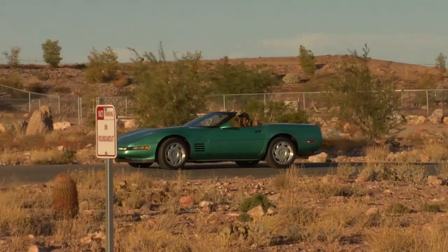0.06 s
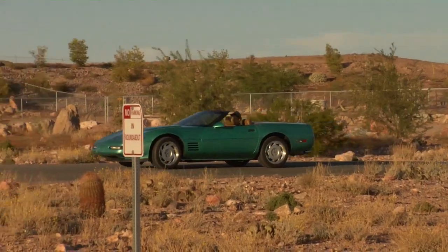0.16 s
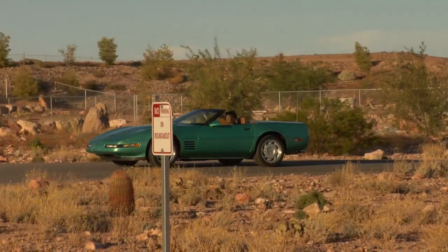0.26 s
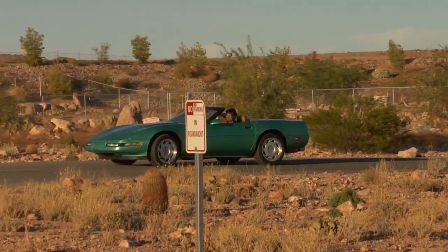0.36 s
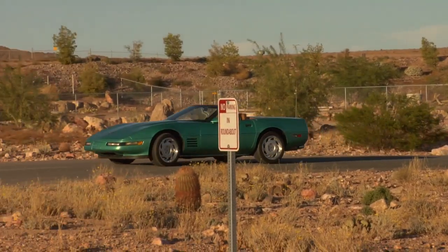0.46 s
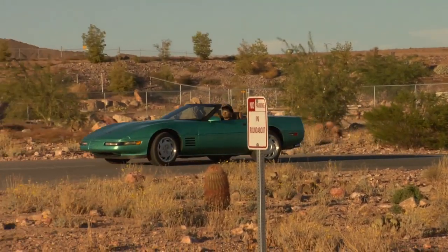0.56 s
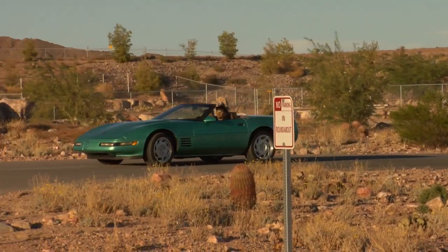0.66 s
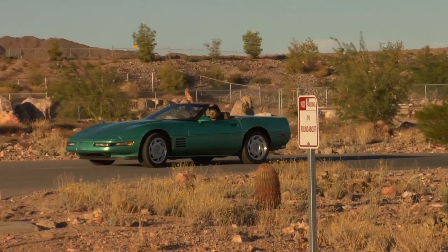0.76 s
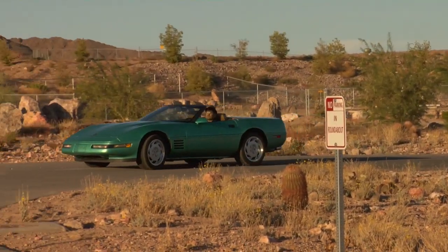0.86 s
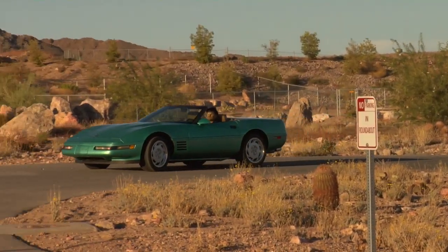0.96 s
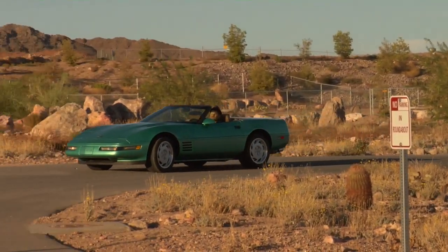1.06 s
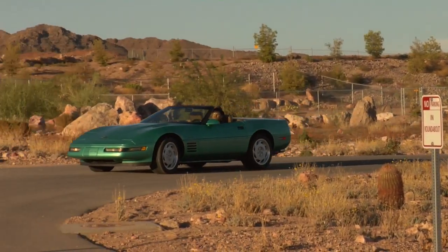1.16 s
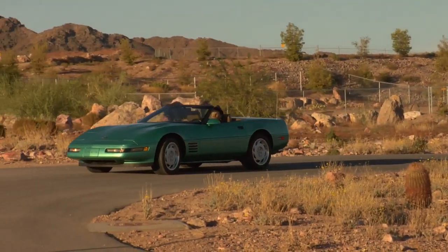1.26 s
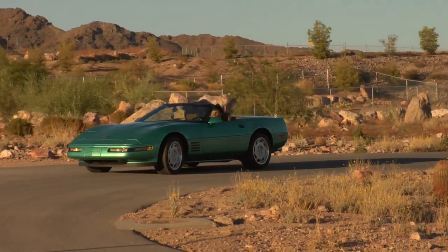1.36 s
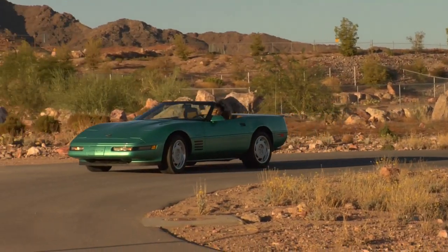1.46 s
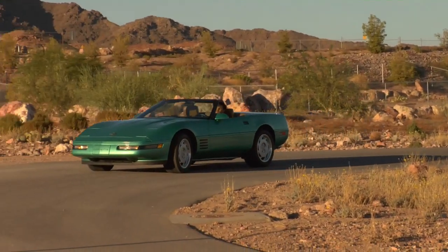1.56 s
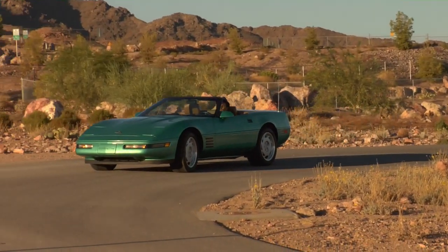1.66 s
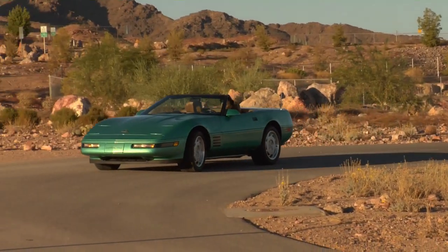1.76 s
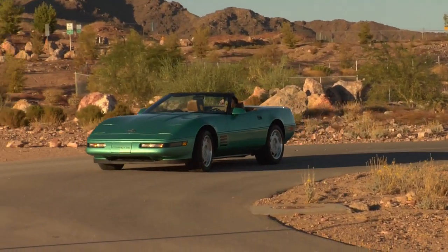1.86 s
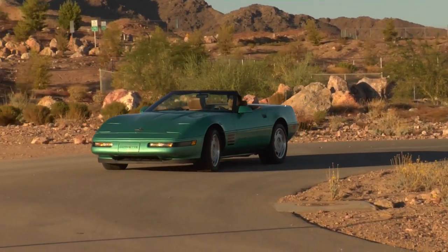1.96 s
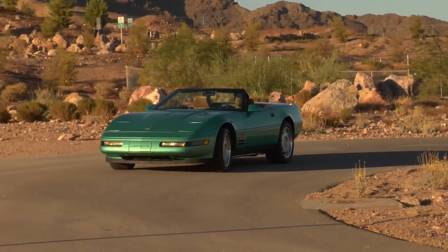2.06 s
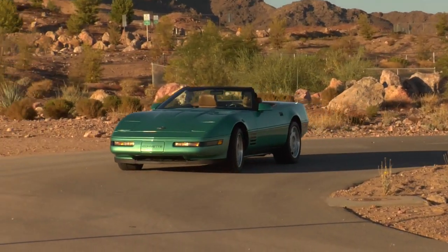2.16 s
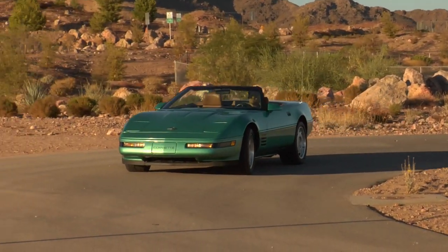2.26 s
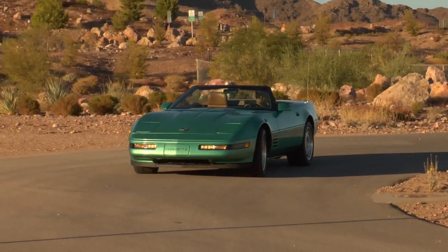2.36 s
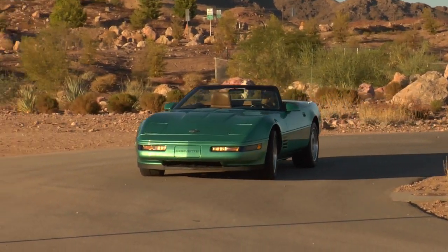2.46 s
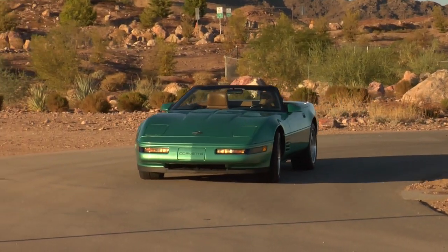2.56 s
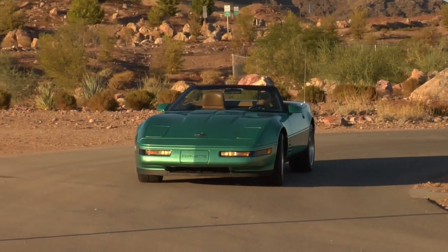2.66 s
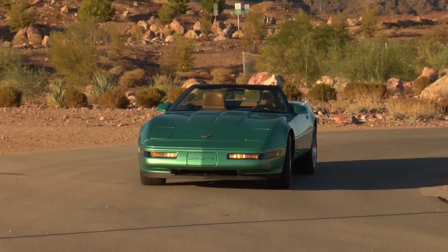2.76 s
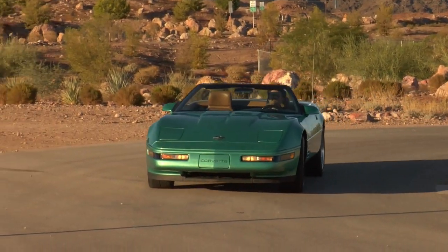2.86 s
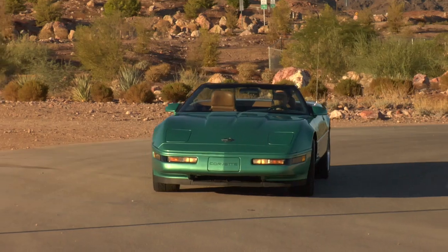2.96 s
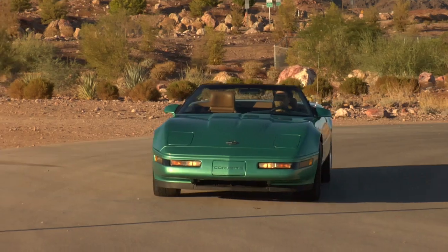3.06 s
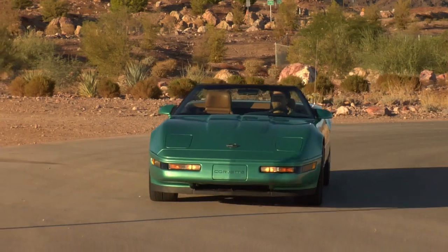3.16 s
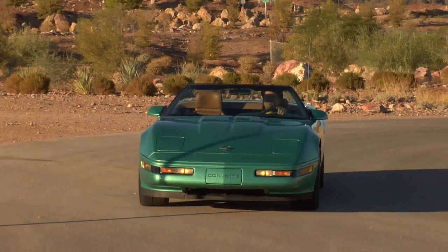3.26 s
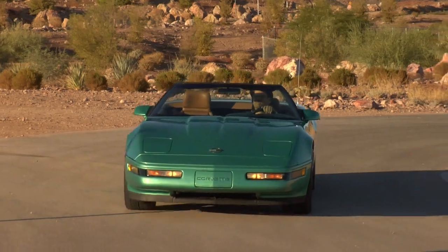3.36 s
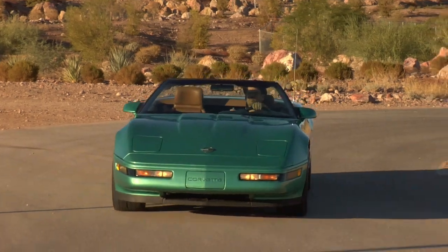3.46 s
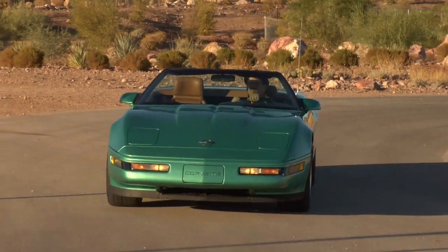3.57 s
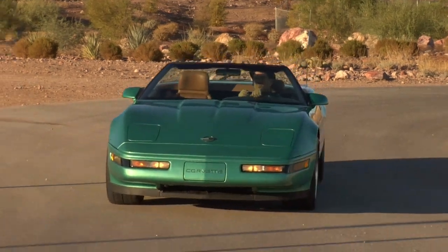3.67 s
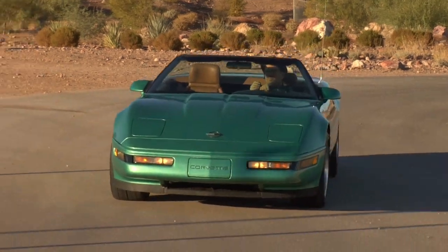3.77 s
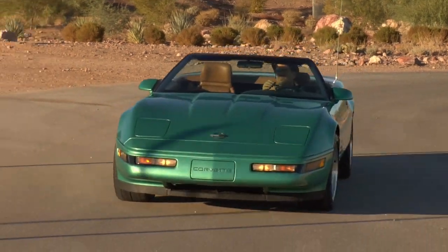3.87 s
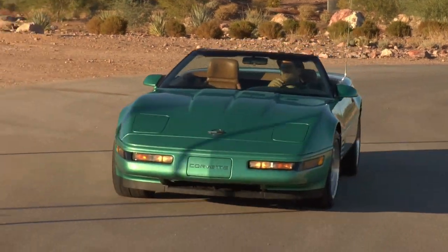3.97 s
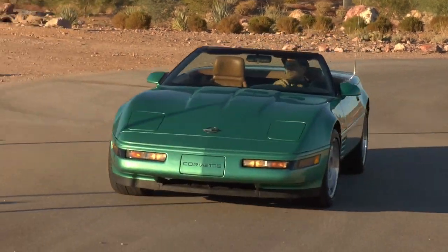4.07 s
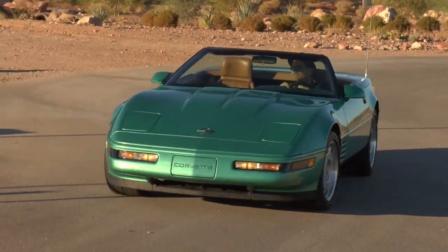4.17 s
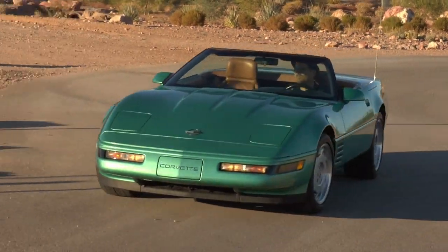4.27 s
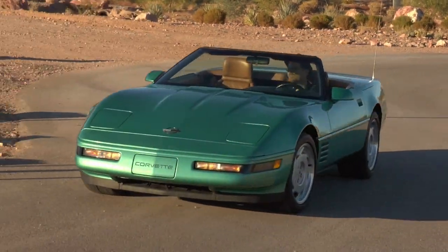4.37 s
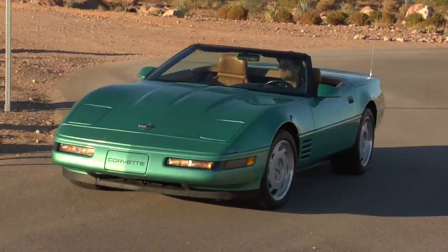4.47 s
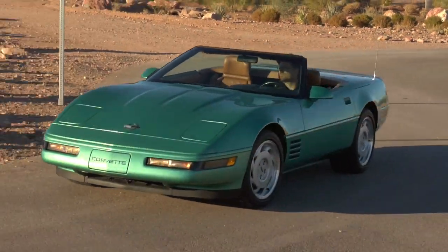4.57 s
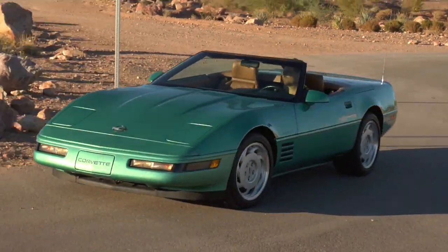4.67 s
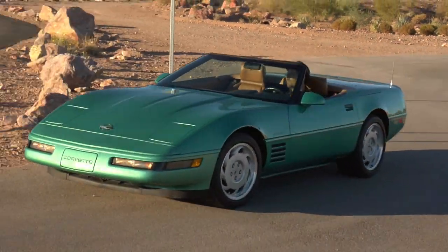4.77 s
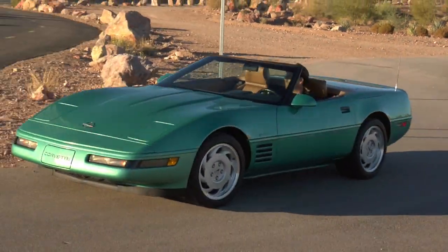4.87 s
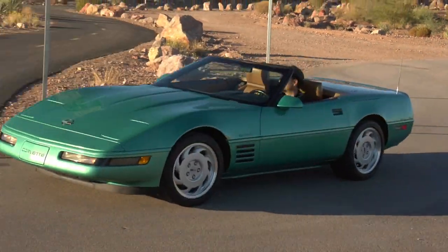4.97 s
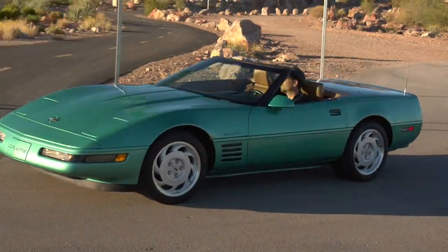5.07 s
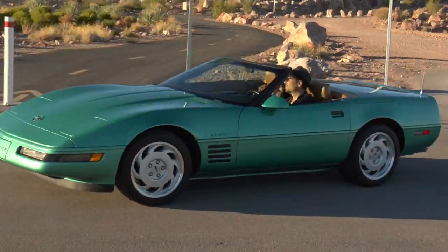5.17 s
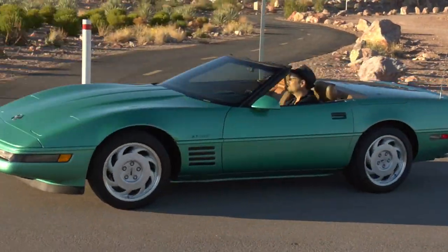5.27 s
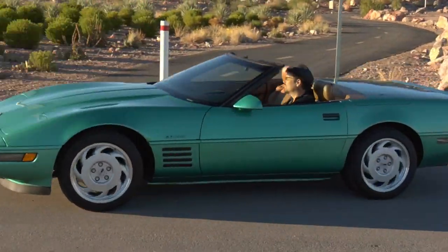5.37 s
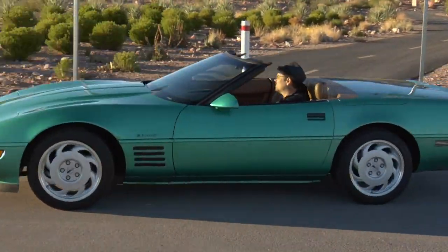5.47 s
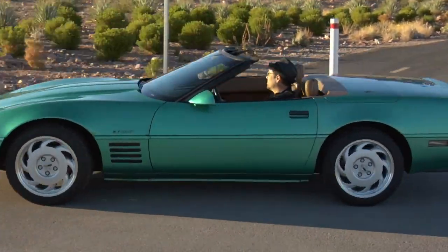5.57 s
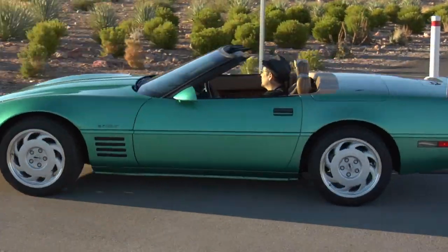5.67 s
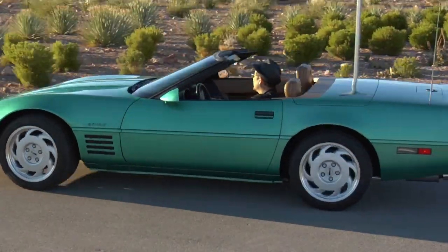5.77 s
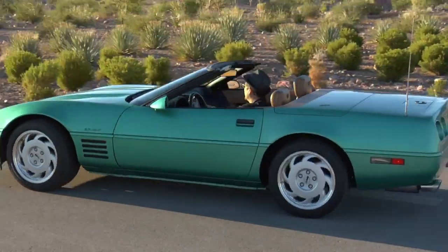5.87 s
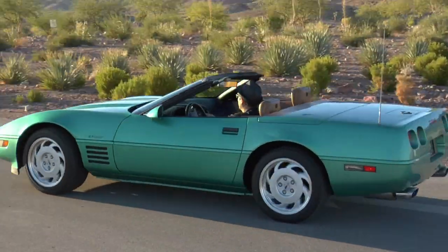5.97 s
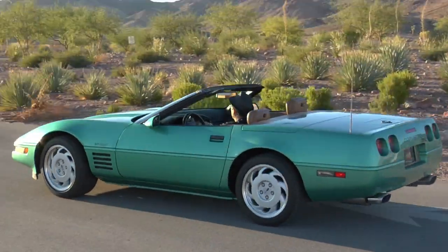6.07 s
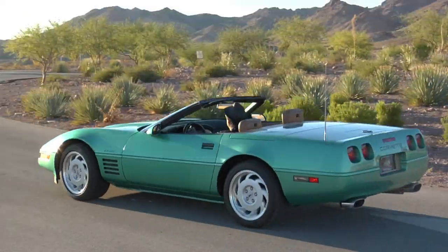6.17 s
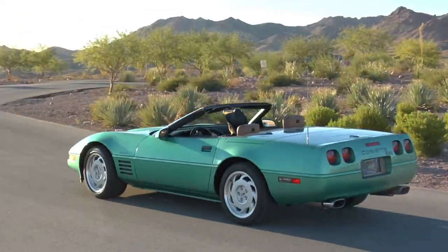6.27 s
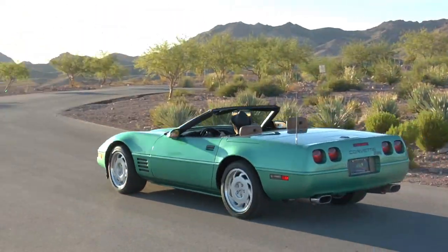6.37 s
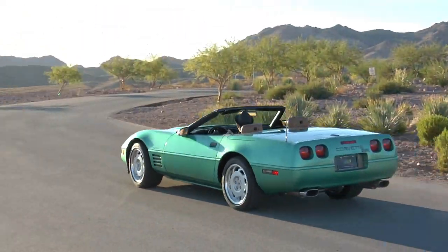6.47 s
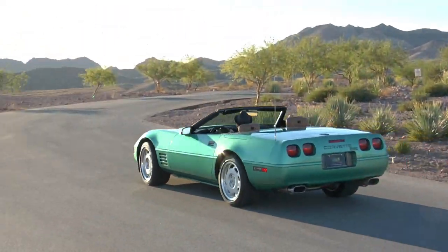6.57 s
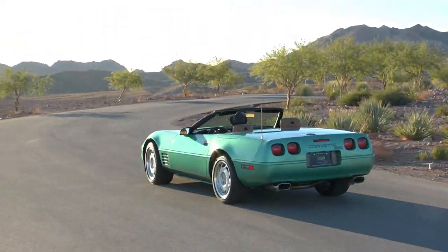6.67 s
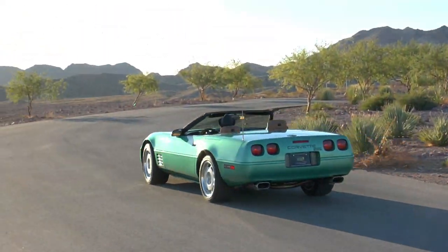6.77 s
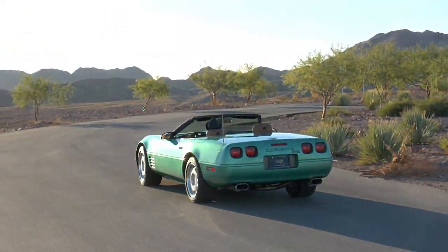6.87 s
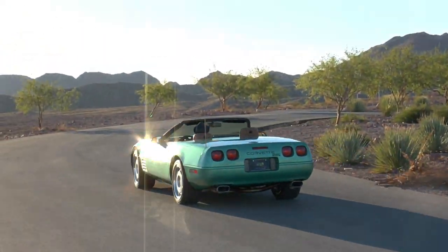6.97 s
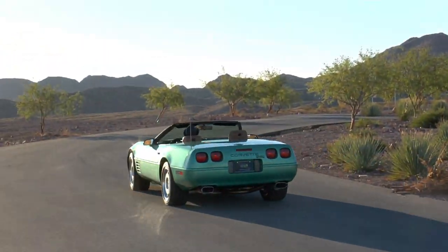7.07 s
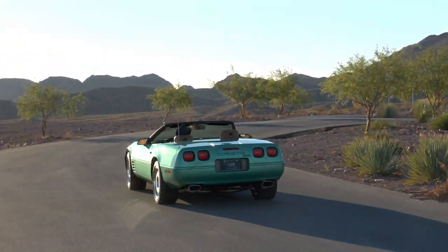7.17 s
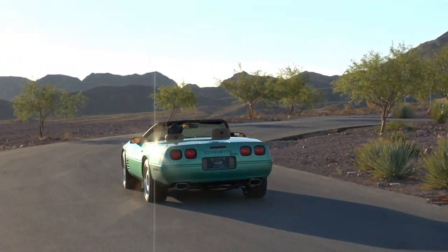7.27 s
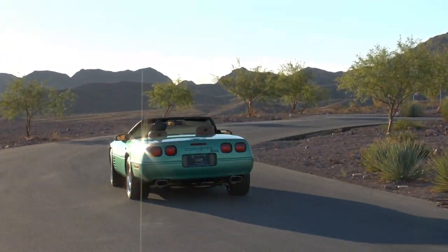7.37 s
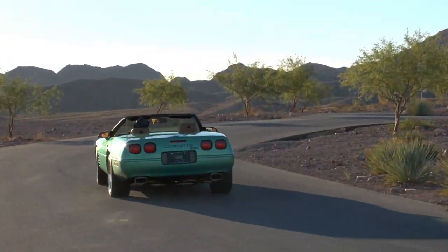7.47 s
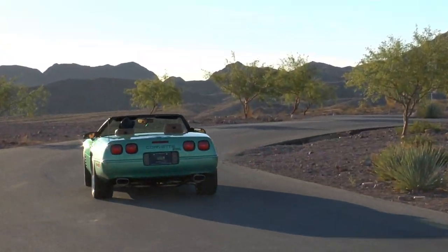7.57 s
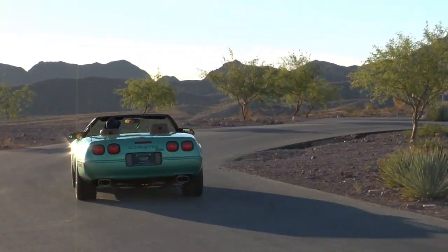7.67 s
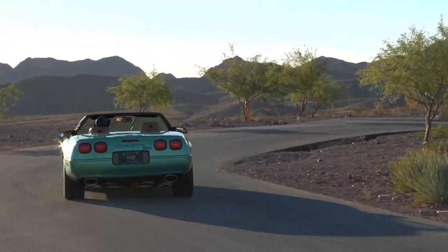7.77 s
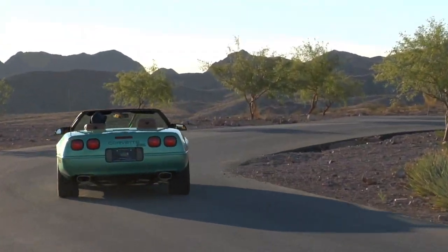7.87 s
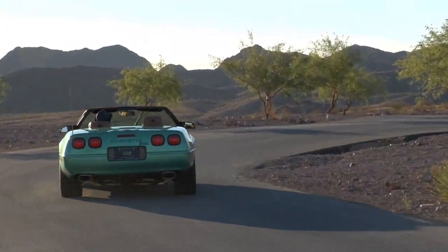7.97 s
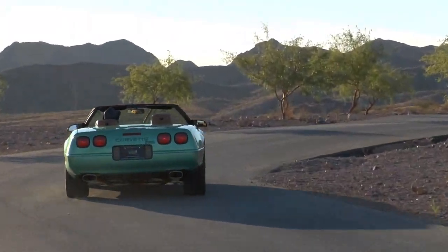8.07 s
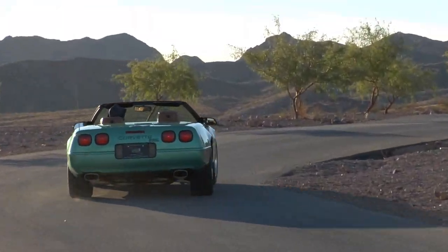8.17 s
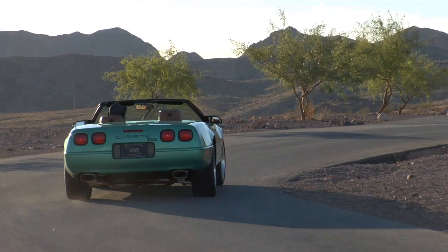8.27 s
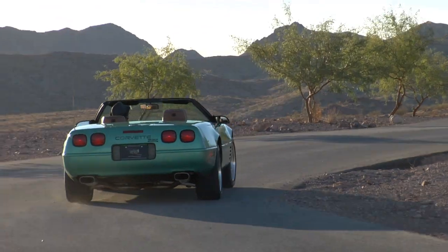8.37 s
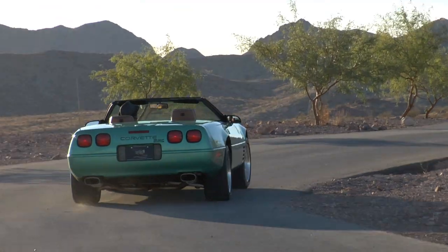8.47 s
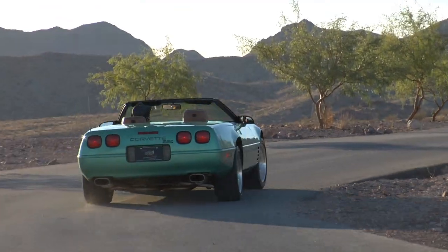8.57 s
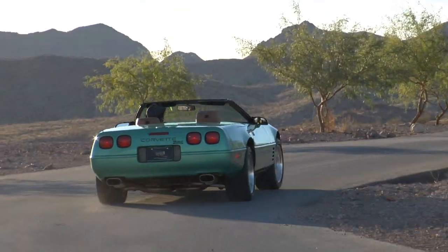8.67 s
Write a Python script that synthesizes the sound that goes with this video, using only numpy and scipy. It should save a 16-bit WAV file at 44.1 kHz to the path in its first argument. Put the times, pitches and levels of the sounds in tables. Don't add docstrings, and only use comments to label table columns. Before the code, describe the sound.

Outdoors on a quiet dry road, a V8 convertible approaches at low revs with soft tyre hum and scattered grit snaps. Near five seconds the throttle opens and the deep exhaust surges, passing close to the roadside microphone just before six. A loose heat shield buzzes faintly behind it, then the burbling exhaust falls in pitch and level as it pulls away.

```python
import sys
import numpy as np
from scipy import signal
from scipy.io import wavfile
from scipy.ndimage import uniform_filter1d

SR = 44100
rng = np.random.default_rng(int(sys.argv[2]) if len(sys.argv) > 2 else 0)


def unload_wav(signal):
    wavfile.write(
        sys.argv[1],
        SR,
        np.round(np.clip(np.atleast_2d(signal).T, -1, 1) * 32767).astype(np.int16),
    )


def gain_from_decibels(decibels):
    exponent = np.asarray(decibels, float) / 20
    return 10 ** exponent


N = 384111

# (centre [Hz], width [Hz], level [dB])
RUMBLE_BANDS = [(35, 15, -19), (64, 44, -4.5), (107, 25, -8), (164, 70, -3)]
DISTANT_HISS = [(1530, 800, -69.5), (2230, 580, -73)]
# (pitch [Hz], level [dB])
WHINES = [(8392, -104), (15674, -99), (15734, -96)]
HISS_DB = -74.5

# (time [s], distance [m])
PATH = [(0, 30.2), (1.4, 24.8), (2.6, 19.6), (4.2, 14.9), (4.8, 8.56), (5.4, 5.5), (5.85, 3.97), (6.3, 4.9),
        (7.0, 7.5), (7.6, 11), (8.4, 16), (8.71, 28)]
CLOSEST_M = 4.14
CLEAR_S = 2.27
LAYERS = {"boom": (-31, 1.0, -0.9, -0.08), "bark": (-37, 0.9352, 2, -0.03), "roar": (-42, 0.6231, 18, 0.4),
          "hiss": (-46, 0.7442, 18, 0.09), "sizzle": (-64, 1.26, -5.5, 0),
          "rumble": (-42.5, 0.28, 0.1, 0.3)}
SWELLS = {"boom": [(1.85, 4.5, 0.7), (2.65, 2, .1), (4.72, 3, .1), (5.85, 2, 0.084), (6.75, -4.5, .2),
          (8.1, -1.5, .2)], "bark": [(5.7, -1.5, .3), (6.66, 6, .25), (7.65, 2, .2)],
          "roar": [(5.15, -2, .12), (6.29, 4.5, .1), (7.8, 3, 0.77)], "hiss": [(1.1, -10.5, 0.25),
          (8.2, 3, 0.33)], "sizzle": [(4.55, 4.5, .25), (5.35, 3, .3), (7.6, -6, .4)],
          "rumble": [(.9, 0, .3), (2.1, -7, 0.35), (3.8, 3.5, 0.26), (4.5, 1.5, 0.41), (7.9, -7.5, .2),
          (8.4, 4, 0.096)]}

# (time [s], peak [dB], pitch [Hz])
GRIT = [(3.5833, -57, 4000), (3.6214, -60, 3800), (4.2453, -54, 3200), (4.4159, -57, 3000),
        (4.4747, -55, 2800), (4.4974, -52, 2700), (4.5351, -50, 2800), (4.6774, -56, 5200),
        (4.8419, -52, 3700), (5.229, -55, 4500), (6.5624, -54, 3700), (7.21, -49, 3500),
        (7.5752, -58, 3000)]
SNAP_S, SNAP_DB = .00025, 1.0
# (time [s], peak [dB])
ROAD_SEAM = [
    (8.215, -33),
]
# (time [s], peak [dB])
CHATTER = [(5.8885, -59), (6.0437, -56), (6.0746, -54), (6.1285, -64), (6.1564, -63), (6.1938, -61),
           (6.2267, -63), (6.2761, -54), (6.2886, -51), (6.316, -49), (6.3609, -56), (6.3949, -52),
           (6.4194, -57), (6.4722, -53), (6.5246, -61), (6.5544, -65), (6.6019, -65), (6.6862, -64),
           (6.7057, -64), (6.8384, -65), (6.9102, -67), (6.9401, -64), (7.1516, -68), (7.1846, -59),
           (7.438, -71), (7.5936, -69), (7.675, -72), (8.4068, -74), (8.548, -74)]
# (centre [Hz], width [Hz], level [dB])
SHIELD_HIGH = [(5090, 330, 0), (5090, 900, -3)]
SHIELD_LOW = [(2400, 140, 0.5), (2870, 420, 5.5), (950, 300, -2.5)]

# (centre [Hz], width [Hz], level [dB])
ROAR = [(806, 140, 1), (960.4, 158, 4.5), (1108, 200, -1)]
SIDEWALL = [(366, 150, -8.5)]
TREAD = [(1437, 615, 12.5), (1910, 510, 6), (2480, 680, -3.5), (2970, 1000, 0), (3916, 1400, -5.5),
         (5230, 1800, -8), (7000, 1700, -13.5)]
# (time [s], pitch [Hz], level [dB])
TREAD_HUM = [
    (0, 520, -66),
    (1.8, 500, -61),
    (3.0, 486, -58),
    (3.6, 478, -52),
    (4.3, 465, -52.5),
    (5.0, 456, -48),
    (5.3, 459, -81),
    (8.71, 459, -90.5),
]

# (centre [Hz], width [Hz], level [dB])
BOOM = [(210, 50, -3.5), (245.1, 38.4, 2), (290.7, 49, -6.5)]
BARK = [(380, 70, -5), (442, 80, 2), (520, 88, 2.5), (608.6, 100, 1.5)]
CYLINDERS_DB = [-2.5, -4, -1, -3, -3, -1, -8.5, -1.5]

# (time [s], firing rate [Hz], exhaust level [dB])
ENGINE = [(0, 54.7, -55), (.4, 57.75, -53), (1.6, 53.66, -57), (2.4, 53.18, -52), (2.8, 55.56, -50),
          (4.4, 52.86, -44.5), (4.8, 55.02, -46.5), (5.0, 62.54, -35.5), (5.3, 89.5, -23),
          (5.5, 99.33, -19), (5.7, 103.5, -17), (6.15, 99.53, -18), (6.6, 104.9, -18.5), (7.2, 97.1, -24),
          (7.55, 98.5, -24), (8.0, 88.8, -30.5), (8.3, 82.04, -35.5), (8.71, 86.83, -34)]
# (coasting [dB], on throttle [dB])
TONES = [
    (-1, 0),
    (6.5, -11.5),
    (-20.5, -17),
    (-12, -8.5),
]
# (time [s], lift [dB], width [s])
LOBES = [
    [(6.16, -8, 0.19)],
    [(5.2, -4.5, .08), (5.42, -14, 0.18), (5.9, -10, 0.13), (6.31, -19.5, .17), (7.72, -5, .1),
     (8.3, 14, 0.38)],
    [(5.1, -13.5, 0.35)],
    [(5.08, -20.5, .1), (5.95, -14.5, .27)],
]
# (order [1], leader [index], coasting against leader [dB], on throttle against leader [dB])
SIDE_ORDERS = [(4, 2, -6, -23), (7, 2, 7, -10), (9, 3, -7.5, -13), (11, 3, 4.5, -13.5), (12, 3, 0.5, -12.5),
               (13, 3, 0.5, -11.5), (14, 3, 2, -10.5), (18, 1, -16, -12), (19, 4, -21, -15.5),
               (20, 4, -22.5, -16.5), (21, 4, -24, -12.5), (23, 4, -32, -7), (23, 1, -11, -29),
               (24, 4, -22, -11), (24, 1, -16.5, -31), (25, 4, -15.5, -20.5)]
TAIL_S, TAIL_TURN_S, FLANK_DB = 6.35, .3, -7.5
# (time [s], lift [dB], width [s])
BURBLE = [
    (7.0, 5, .45),
    (8.5, -4, .4),
]
RASP_DB = 1.8


def curves(table):
    s, *columns = np.transpose(table)
    return [np.interp(np.arange(N) / SR, s, column) for column in columns]


def unit(x):
    return x / np.sqrt(np.mean(x ** 2))


def ring(x, modes, order=1):
    out = np.zeros(N)
    for hz, width, db in modes:
        edges = [hz - width / 2, hz + width / 2]
        sos = signal.butter(order, edges, "bandpass", fs=SR, output="sos")
        out += gain_from_decibels(db) * signal.sosfilt(sos, x) / np.sqrt(width)
    return out


def rush(modes, order=2):
    return sum(ring(rng.standard_normal(N), [mode], order=order) for mode in modes)


def walk(rate):
    hold = int(SR / rate / 32)
    steps = np.repeat(rng.standard_normal(N // 32 // hold + 2), hold)
    slow = uniform_filter1d(uniform_filter1d(steps, hold), hold)
    return 1.3 * np.interp(np.arange(N) / 32, np.arange(len(slow)), slow)


def swells(rows):
    t = np.arange(N) / SR
    return sum(db * np.exp(-.5 * ((t - s) / width) ** 2) for s, db, width in rows)


def heard(layer):
    top_db, share, screen_db, lead_s = LAYERS[layer]
    t = np.arange(N) / SR
    metres = np.interp(t + lead_s, *np.transpose(PATH))
    distance_db = share * 20 * np.log10(metres / CLOSEST_M)
    verge_db = screen_db * np.clip(1 - t / CLEAR_S, 0, 1)
    return top_db - distance_db - verge_db + swells(SWELLS[layer])


def bursts(table, rise_s, fall_s):
    t = np.arange(int(.15 * SR)) / SR
    shape = (1 - np.exp(-t / rise_s)) * np.exp(-t / fall_s)
    starts = np.zeros(N)
    for s, db in table:
        starts[int(s * SR)] = gain_from_decibels(db)
    return signal.fftconvolve(starts, shape / shape.max())[:N]


def ambience():
    rumble = unit(sum(gain_from_decibels(1.7 * walk(2.9)) * rush([band]) for band in RUMBLE_BANDS))
    far = sum(gain_from_decibels(db) * unit(rush([(hz, width, 0)])) for hz, width, db in DISTANT_HISS)
    hiss = gain_from_decibels(HISS_DB) * rng.standard_normal(N)
    whine = sum(gain_from_decibels(db) * np.sin(2 * np.pi * hz * np.arange(N) / SR) for hz, db in WHINES)
    return gain_from_decibels(heard("rumble")) * rumble + far + hiss + whine


def grit():
    out = bursts(ROAD_SEAM, .025, 0.045) * np.sin(2 * np.pi * 118 * np.arange(N) / SR)
    t = np.arange(SR // 200) / SR
    snap = t / SNAP_S * np.exp(1 - t / SNAP_S)
    for s, db, hz in GRIT:
        out[int(s * SR):][:len(t)] += gain_from_decibels(db + SNAP_DB) * snap * np.sin(2 * np.pi * hz * t)
    return out


def heat_shield():
    contacts = rng.standard_normal((2, N))
    high = unit(ring(bursts(CHATTER, .003, .013) * contacts[0], SHIELD_HIGH, order=2))
    low = unit(ring(bursts(CHATTER, .004, 0.012) * contacts[1], SHIELD_LOW, order=2))
    return gain_from_decibels(-77) * high + gain_from_decibels(-73) * low


def tyres(roar_db, hiss_db):
    hum_hz, hum_db = curves(TREAD_HUM)
    hum_phase = 2 * np.pi * np.cumsum(hum_hz + 4 * walk(9)) / SR
    hum = gain_from_decibels(hum_db + 1.6 * walk(2.3)) * np.sin(hum_phase)

    roar = unit(rush(ROAR)) + gain_from_decibels(SIDEWALL[0][2]) * unit(rush(SIDEWALL))
    roar *= gain_from_decibels(roar_db + 0.66 * walk(8.7))

    sizzle_db = heard("sizzle")
    far_db = sizzle_db - sizzle_db.max()
    hiss = unit(rush(TREAD[:2]) + gain_from_decibels(0.62 * far_db + 6.5) * rush(TREAD[2:3]))
    hiss *= gain_from_decibels(hiss_db + 0.33 * walk(10))

    sizzle = sum(gain_from_decibels(lose * far_db) * rush([mode]) for mode, lose in zip(TREAD[3:], (0, .1, .3, .6)))
    sizzle /= np.sqrt(np.mean(rush(TREAD[3:5]) ** 2))
    return hum + roar + hiss + gain_from_decibels(sizzle_db + 0.5) * sizzle


def firings(cycle, rate_hz):
    at = np.flatnonzero(np.diff(np.floor(8 * cycle))) + 1
    chance = rng.standard_normal((len(at), 2))
    which = np.arange(len(at)) % 8
    lag = (.2 * rng.random(8)[which] + .02 * chance[:, 0]) * SR / rate_hz[at]
    strength = gain_from_decibels(np.array(CYLINDERS_DB)[which] + 1.5 * chance[:, 1])
    pulses = np.zeros(N)
    np.add.at(pulses, np.clip(at + lag.astype(int), 0, N - 1), strength)
    return pulses / np.sqrt(uniform_filter1d(pulses ** 2, SR // 4) + 1e-12)


def body(pulses, boom_db, bark_db, throttle):
    pan = sum(gain_from_decibels(lift_db * (0.5 - throttle)) * rush([mode]) for mode, lift_db in zip(BOOM, (-3, 0, -5)))
    boom = .75 * unit(ring(pulses, [(245, 85, 0)], order=2)) + .7 * unit(pan)
    bark = (.4 + .45 * throttle) * unit(ring(pulses, [(520, 140, 0)], order=2))
    bark += (.9 - .3 * throttle) * unit(rush(BARK))
    return gain_from_decibels(boom_db + 0.77 * walk(7)) * unit(boom) + gain_from_decibels(bark_db + 1.1 * walk(9)) * unit(bark)


def exhaust(cycle, leads_db, throttle):
    steady_db = [uniform_filter1d(db, SR // 3) for db in leads_db]
    fire, lope = (np.exp(2j * np.pi * (k * cycle + rng.random() + .004 * walk(9))) for k in (8, 5))
    octave = fire ** 2
    double_lope = -1j * lope ** 2
    scramble = np.clip((steady_db[4] - steady_db[1]) / 6, 0, 1.3)
    octave *= np.exp(1j * throttle * scramble * walk(16))
    tones = (fire, octave, lope, double_lope)
    out = sum(gain_from_decibels(db + .5 * walk(8)) * tone for db, tone in zip(leads_db, tones))

    turn = np.exp(2j * np.pi * (cycle + .015 * walk(4)))
    depth = (.12 + .5 * throttle) * gain_from_decibels(swells(BURBLE))
    swing = depth * (1.3 + 1j) * (.42 * turn + .58 / turn)
    out += gain_from_decibels(steady_db[1] + .8 * walk(4) - 1) * swing * octave

    out += gain_from_decibels(steady_db[2] + 2 - 8 * throttle + walk(5)) * fire ** 2 / double_lope

    hidden_db = FLANK_DB * throttle * np.clip((TAIL_S - np.arange(N) / SR) / TAIL_TURN_S, 0, 1)
    for k, lead, coast_db, pull_db in SIDE_ORDERS:
        wobble = rng.random() + .03 * walk(5)
        db = steady_db[round(lead)] + coast_db + throttle * (pull_db - coast_db) + 1.5 * walk(4.5)
        if 10 < round(k) < 15:
            db = db + hidden_db
        out += gain_from_decibels(db) * np.exp(2j * np.pi * (round(k) * cycle + wobble))
    return np.sqrt(2) * out.imag


def scene():
    rate_hz, level_db = (uniform_filter1d(curve, SR // 10) for curve in curves(ENGINE))
    cycle = np.cumsum(rate_hz) / SR / 8
    throttle = np.clip((rate_hz - 62) / 20, 0, 1)
    rasp_db = RASP_DB * throttle * np.cos(2 * np.pi * cycle)
    boom_db, bark_db = heard("boom"), heard("bark")
    leads_db = [level_db + coast + throttle * (pull - coast) + swells(lobes)
                for (coast, pull), lobes in zip(TONES, LOBES)] + [boom_db]

    mix = ambience() + grit() + heat_shield()
    mix += tyres(heard("roar") + rasp_db / 2, heard("hiss"))
    mix += body(firings(cycle, rate_hz), boom_db, bark_db + rasp_db, throttle)
    mix += exhaust(cycle, leads_db, throttle)
    return mix[None]


def roll_off(x):
    return signal.sosfilt(signal.butter(12, 15760, fs=SR, output="sos"), x)


def record(dry):
    low_cut = signal.butter(2, 24, "highpass", fs=SR, output="sos")
    mix = signal.sosfilt(low_cut, dry)
    return roll_off(mix)


dry = scene()
out = record(dry)
unload_wav(out)
```